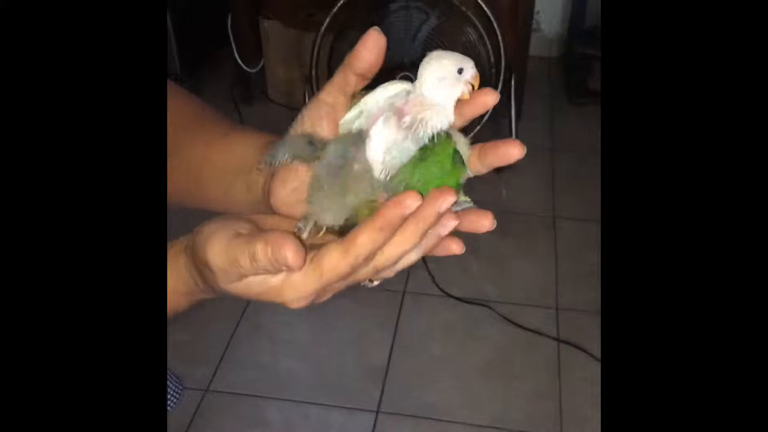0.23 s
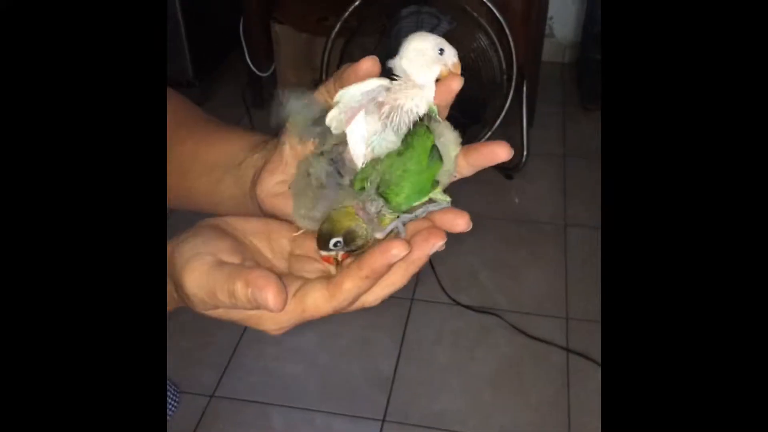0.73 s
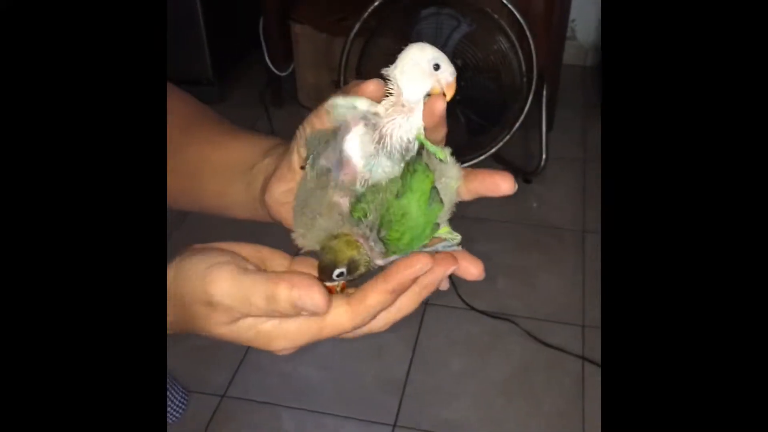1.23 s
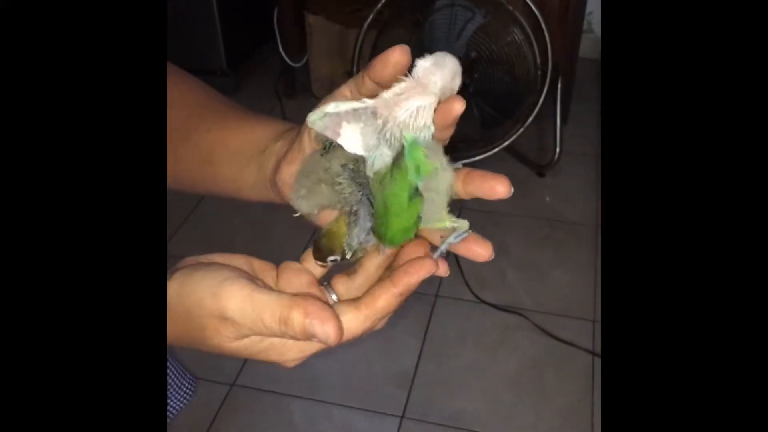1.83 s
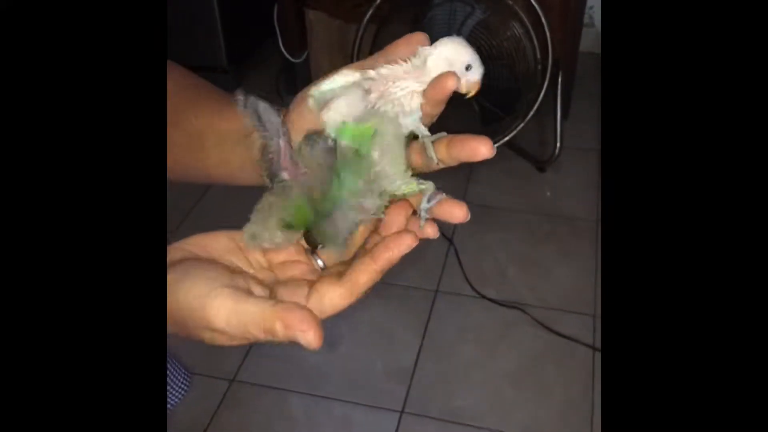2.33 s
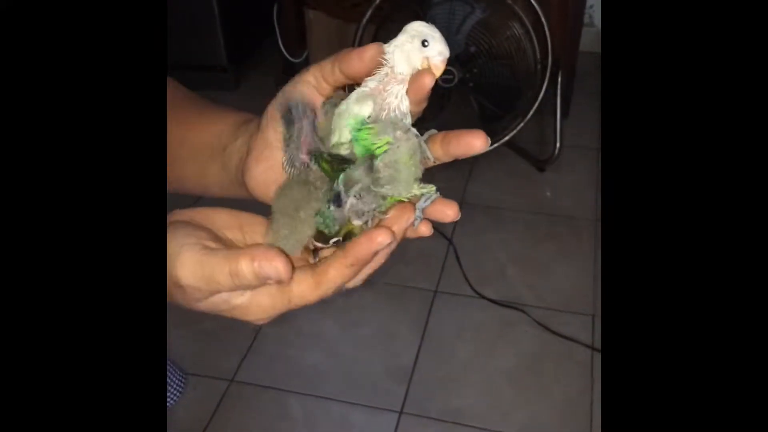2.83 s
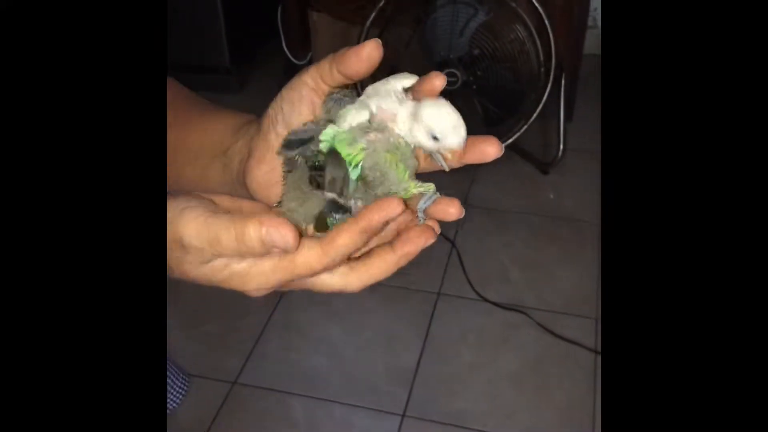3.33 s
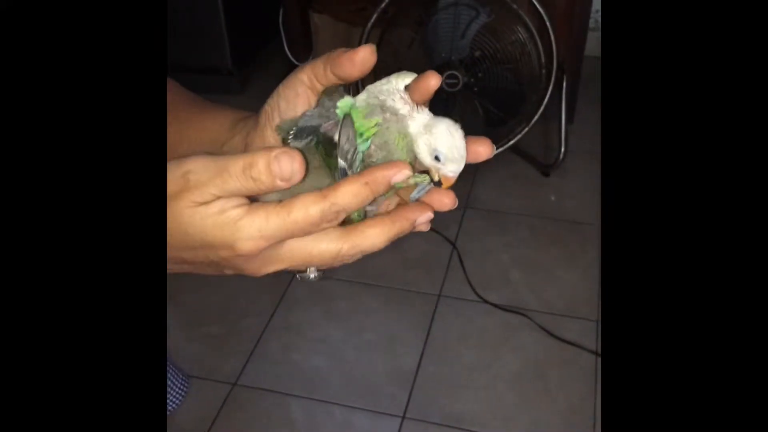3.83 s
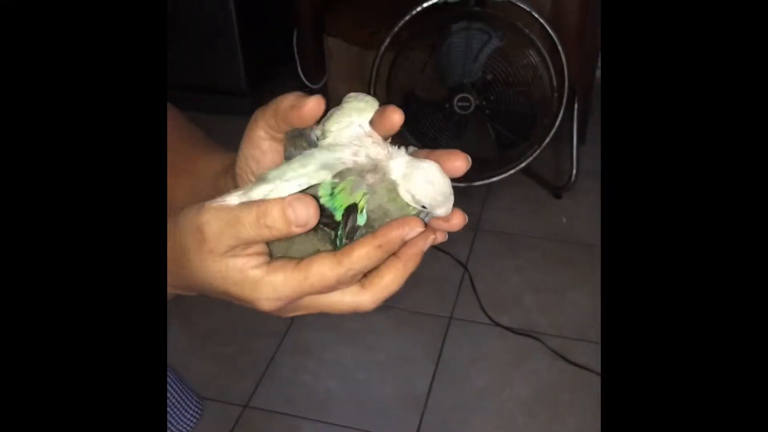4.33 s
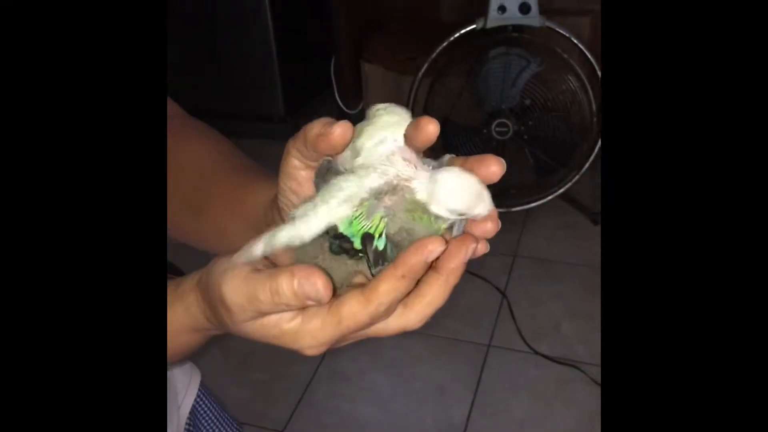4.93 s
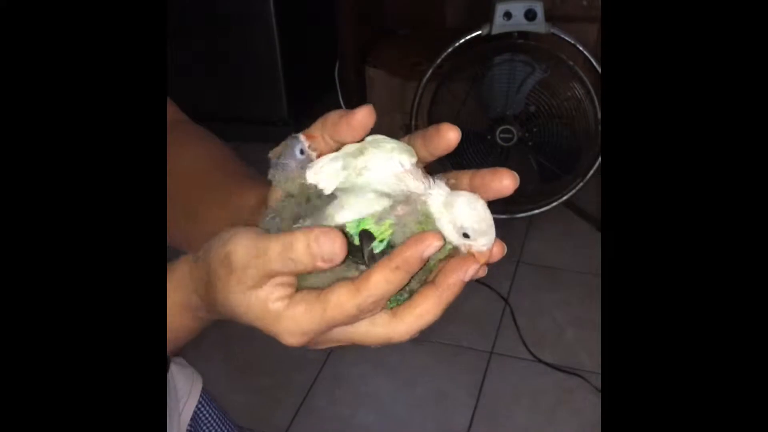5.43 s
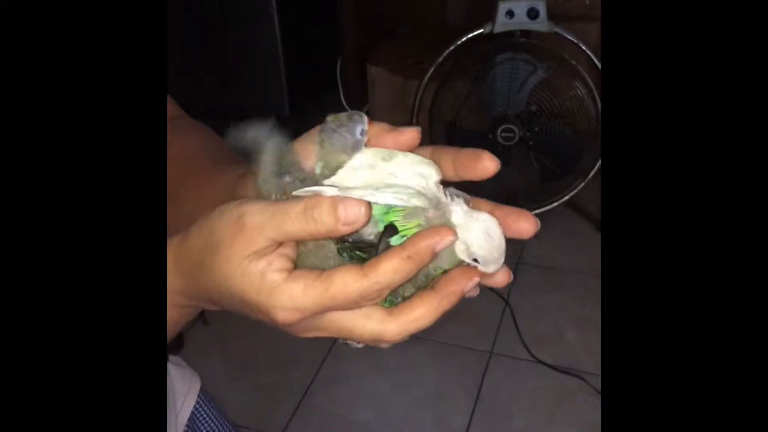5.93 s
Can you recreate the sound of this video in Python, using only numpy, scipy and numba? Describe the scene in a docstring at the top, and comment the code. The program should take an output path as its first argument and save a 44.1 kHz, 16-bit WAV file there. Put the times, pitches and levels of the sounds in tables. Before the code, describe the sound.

The sound fades in quickly on the faint low hum and airy rush of a floor fan, which continues throughout. Parrot chicks squawk close by, each call short, high, harsh and raspy. After one weak call at the start, two squawks come at about 0.5 to 0.8 seconds and two more at 1.1 to 1.3. A louder, rapid run of four follows from 1.7 to 2.4 seconds, and another cluster builds from 2.9 to 3.6, loudest near 3.3. From 3.7 to 4.8 seconds the squawking stops, leaving the fan, a few tiny peeps and soft scrapes of feathers and claws on skin. Similar light rustles lie between the other calls. Squawks return from 4.9 to 5.2 seconds, with two longer ones from 5.5 to 6. The tiled room gives the birds a short, bright echo.

```python
"""A floor fan's hum fades in; lovebird chicks held in cupped hands squawk in clusters in a tiled room.
Each squawk is a syrinx tone near 2-3 kHz that breaks into chaos and half-pitch lines, coloured by
throat and beak. Feather rustles and small peeps fill the gaps, and the tiles echo the birds.
The fan sounds multiples of its shaft rate over the rush of moving air."""
import sys
import numpy as np
from scipy import signal
from scipy.fft import rfft, irfft
from scipy.io import wavfile
from scipy.ndimage import uniform_filter1d
from numba import njit

SR = 44100
rng = np.random.default_rng(int(sys.argv[2]) if len(sys.argv) > 2 else 0)


def store_pcm(level_fs):
    """Save levels as 16-bit WAV."""
    pcm = np.round(np.clip(level_fs, -1, 1) * 32767).astype(np.int16)
    wavfile.write(sys.argv[1], SR, np.atleast_2d(pcm).T)


N = 272097


def undb(db):
    return 10 ** (np.asarray(db) / 20)


def unit(x):
    return x / np.sqrt(np.mean(x ** 2))


@njit
def svf(x, hz, width_hz, high):
    """State-variable filter with a moving centre: band-pass, or high-pass if high is 1."""
    y, band_state, low_state = np.empty(len(x)), 0., 0.
    for i in range(len(x)):
        g, damping = np.tan(np.pi * hz[i] / SR), width_hz[i] / hz[i]
        mid = (band_state + g * (x[i] - low_state)) / (1 + g * (g + damping))
        low = low_state + g * mid
        band_state, low_state = 2 * mid - band_state, 2 * low - low_state
        y[i] = high * (x[i] - damping * mid - low) + (1 - high) * damping * mid
    return y


def band(x, hz, width_hz):
    """A resonance applied twice, for steep skirts."""
    hz, width_hz = np.full(len(x), hz, float), np.full(len(x), width_hz, float)
    return svf(svf(x, hz, width_hz, 0.), hz, width_hz, 0.)


def walk(hz, count=N):
    """Smooth random wander of RMS 1, turning about hz times a second."""
    span = max(int(SR / hz), 1)
    return unit(uniform_filter1d(uniform_filter1d(rng.standard_normal(count), span), span))


def add(track, x, start_s):
    i = int(start_s * SR)
    track[i:i + len(x)] += x[:N - i]


def fan(shaft_hz=23.5, flutter_hz=16, flutter_depth=.9):
    """Shaft harmonics flutter in the turbulent intake, over moving air that swells slowly."""
    # Each row: multiple of the shaft rate, level in dB.
    harmonics = [(2, -49), (3, -51), (4, -60), (5, -60), (6, -58), (7, -58), (8, -61), (9, -62), (12, -67)]
    # Each row: frequency in Hz, relative spectral density in dB.
    air_spectrum = [(20, -17), (45, -13), (130, 0), (200, -12), (260, -9.5), (340, -8.5), (520, -15),
                    (850, -18.5), (1150, -14), (1800, -23), (2700, -19), (4500, -32.5), (6500, -32),
                    (15000, -38.5)]
    # Each row: time in seconds, mean air level in dB.
    air_levels = [(.3, -51.5), (1.4, -51.5), (2.7, -51.5), (3.3, -49), (4, -52), (5.1, -50), (6.1, -53)]
    phase = 2 * np.pi * np.cumsum(shaft_hz * (1 + .004255 * walk(1.83))) / SR
    hum = 0
    for k, db in harmonics:
        flutter = 1 + flutter_depth * (walk(flutter_hz) + 1j * walk(flutter_hz))
        hum += undb(db) * unit(np.imag(flutter * np.exp(1j * k * phase)))
    bin_hz = np.fft.rfftfreq(N, 1 / SR) + 1
    air_hz, air_db = np.transpose(air_spectrum)
    colour = undb(np.interp(np.log(bin_hz), np.log(air_hz), air_db, left=-40))
    air = unit(irfft(rfft(rng.standard_normal(N)) * colour, N))
    swell_db = np.interp(np.arange(N) / SR, *np.transpose(air_levels)) + 1.53 * walk(6)
    return hum + undb(swell_db) * air


def syrinx(hz, rough, half_share, chaos_hz=496.7, breath_db=3.5):
    """A chaotic cycle plus breath noise; every second beat is weaker, giving half-pitch lines."""
    jitter = .3 * (.0084 + 1.5 * rough ** 3) * walk(chaos_hz, len(hz))
    half_phase = np.pi * np.cumsum(hz * (1 + jitter)) / SR
    voice = undb(breath_db) * (rough + .46) * rng.standard_normal(len(hz))
    for k in range(1, 15):
        gain = (half_share if k % 2 else 1) * (k * hz / 2 < 16500)
        voice += gain * np.cos(k * half_phase + k ** 2)
    for _ in range(3):  # the tiny body radiates little below the pitch
        voice = svf(voice, (.9 - .041 * rough) * hz, 1.16 * hz, high=1.)
    return voice


def squawk(contour, colour, attack_s=.009, release_s=.015, rasp_hz=159):
    """The syrinx rings throat, beak and higher resonances. Returns the call and its start in seconds."""
    # Each row: centre in Hz, width in Hz, relative gain in dB.
    top_resonances = [(9500, 3000, 0), (12300, 2600, -3), (14600, 1600, -10)]
    times_s, *columns = np.transpose(contour)
    t = np.arange(times_s[0] - attack_s, times_s[-1] + release_s, 1 / SR)
    hz, level_db, lean_db, rough, half_share = (np.interp(t, times_s, c) for c in columns)
    base_db, throat_hz, beak_from_hz, beak_to_hz, upper_hz, upper_db, top_db, tire_db_per_s = colour
    voice = syrinx(hz, rough, half_share)

    widen = .42 + rough
    base = band(voice, hz, (.27 + .49 * rough) * hz)
    throat = band(voice, throat_hz, widen * 1400)
    beak = band(voice, np.linspace(beak_from_hz, beak_to_hz, len(t)), widen * 1800)
    upper = band(voice, upper_hz, widen * 2800)
    top = sum((-1) ** k * undb(db) * band(voice, centre_hz, width_hz)
              for k, (centre_hz, width_hz, db) in enumerate(top_resonances))

    age_s = t - t[0]
    tired_db = tire_db_per_s * age_s
    effort_db = level_db - level_db.max()  # weaker effort is duller
    scratch_db = 3 * walk(400, len(t))  # sharp closures spike the treble
    parts = [(base, base_db - 48 * age_s),
             (throat, np.minimum(-lean_db, 0)),
             (beak, np.minimum(lean_db, 0)),
             (upper, upper_db + .6 * effort_db - .95 * tired_db + scratch_db / 2),
             (top, top_db + .89 * effort_db - tired_db + scratch_db)]
    call = 0
    for part, db in parts:
        running_rms = np.sqrt(np.abs(uniform_filter1d(part ** 2, SR // 40)) + 1e-6)
        call += undb(level_db + db) * part / running_rms
    rasp = unit(undb(3.745 * rough * walk(rasp_hz, len(t))))  # membranes slap shut irregularly
    edges = np.clip(age_s / attack_s, 0, 1) * np.clip((t[-1] - t) / release_s, 0, 1)
    return call * rasp * edges ** 2, t[0]


def squawks():
    """Clusters of calls, each with its own pitch contour and resonances."""
    # One table per call. Each row: time in seconds, pitch in Hz, level in dB, beak over throat in dB,
    # roughness 0-1, half-pitch share 0-1.
    contours = [
        [(.13, 2270, -42, 15, 0.79, 0.3), (.2, 2326, -64.5, 22, 0.91, .9), (.26, 2420, -71, 2, 0.8, .4)],
        [(.455, 2688, -50, -4, .5, 0.4), (.478, 2680, -31.5, 3, 0.42, 0.8), (.49, 2693, -25, 15, 0.61, 0.8),
         (.494, 1797, -31.5, -7, 0.83, .9), (.525, 1865, -33, 0, 0.55, 1), (.56, 1840, -45.5, 6, 0.4, .9)],
        [(.62, 2012, -34.5, -29, 0.43, 0.7), (.65, 1694, -33.5, 2, .69, .9), (.685, 1666, -26, 6, 0.71, 1),
         (.715, 1864, -34.5, -33, 0.57, 0.7), (.75, 1540, -34, -12, 0.66, 1), (.785, 1783, -68, -12, 0.6, 0.6)],
        [(1.055, 3090, -50, -3, 0.82, 0.7), (1.072, 3067, -34, 19, 0.42, 0), (1.086, 3577, -34.5, -1, .2, 0),
         (1.105, 2870, -38, -7, 0.28, 0.15), (1.14, 2754, -37.5, 2, 0.52, 1), (1.175, 3470, -46, -6, .62, 0.3)],
        [(1.245, 3103, -37.5, 18, .4, .4), (1.262, 3124, -28.5, 1, 0.39, .15), (1.27, 3600, -38, -12, 0.16, .2),
         (1.288, 2850, -28, -21, 0.42, 0.2), (1.325, 3045, -55, -21, 0.66, .9)],
        [(1.73, 4283, -34.5, -3, 0.35, 0), (1.753, 4380, -29.5, 6, 0.58, .1), (1.757, 2152, -26, 11, 0.67, 0.1),
         (1.8, 2191, -28, 13, 0.58, 0.1), (1.84, 3100, -28, 5, 0.44, 0), (1.88, 3130, -24, 8.5, .49, 0),
         (1.915, 3170, -35, 9, 0.79, 0.4)],
        [(1.985, 2010, -30, 7, 0.56, 0.05), (2.01, 2059, -25.5, -4, 0.68, 0.8),
         (2.05, 2727, -31, 5.5, 0.61, .8), (2.085, 2710, -42, -10.5, 0.6, .2)],
        [(2.155, 2298, -33, 20, 0.56, 0), (2.185, 2383, -26.5, 1, 0.57, .8), (2.215, 2510, -27, 5, 0.75, .8),
         (2.24, 3464, -31.5, -14, 0.08, 0.3), (2.26, 3320, -34, 9, 0.2, 0.85)],
        [(2.36, 2545, -27, 20, 0.53, 0.5), (2.385, 2442, -25.5, -1.5, 0.6, .6),
         (2.41, 2563, -35, 9.5, 0.64, .7), (2.435, 2535, -54, 15, 0.45, .4)],
        [(2.885, 3056, -44.5, -9, 0.71, .8), (2.915, 3110, -42, -19, .78, 0.6),
         (2.99, 3040, -54.5, 1.5, 0.3, .9)],
        [(3.058, 3150, -34.5, -17, 0.42, 0.7), (3.075, 3170, -28, -19.5, 0.55, 0.75),
         (3.08, 3660, -41, -17, 0.13, 0.2), (3.097, 2890, -34, -4.5, 0.4, .4), (3.115, 3130, -48, 0.5, 0.55, 1)],
        [(3.232, 3070, -42, -9.5, 0.36, 0.4), (3.247, 3100, -37, 4, 0.28, .3),
         (3.253, 2441, -29.5, 14.5, 0.39, 1), (3.275, 2439, -21.5, 14.5, 0.26, 0),
         (3.31, 2501, -22.5, 15, 0.45, 1), (3.345, 2503, -21.5, -19, 0.26, 0.8),
         (3.375, 2472, -26, -2, 0.53, 0.8), (3.4, 2192, -26, 6, 0.49, 1), (3.435, 2364, -29, 8.5, 0.63, 1)],
        [(3.495, 2844, -27.5, 2, 0.49, 0.98), (3.52, 2930, -29, -3, 0.51, 0.92),
         (3.55, 2768, -31, -4, 0.54, 0.97), (3.585, 2842, -34, 8, 0.47, 1), (3.61, 2910, -27, 18, 0.62, 1)],
        [(4.83, 3880, -48.5, -11, 0.4, .5), (4.875, 3910, -62, -4, 0.75, .1)],
        [(4.925, 1988, -42, 10, 0.8, 0.5), (4.95, 2116, -29.5, -2.5, 0.91, 0.3),
         (4.985, 2675, -26.5, 2, 0.71, 0.9), (5.015, 2293, -34, 3, 0.87, 1), (5.045, 2160, -33, -9, 0.38, 1)],
        [(5.125, 2456, -24, 34, .59, .8), (5.15, 2506, -24.5, -0.5, 0.5, 1), (5.18, 2433, -28.5, -5.5, 0.66, 1),
         (5.21, 2453, -43, 1, 0.57, 1)],
        [(5.509, 2167, -27.5, 33, 0.41, 0.1), (5.53, 2200, -25.5, 8, 0.23, 0), (5.57, 2165, -25, 13, 0.27, 0.3),
         (5.6, 2320, -27.5, -1, .58, 0.9), (5.64, 2300, -25.5, -18, 0.57, 0.25),
         (5.68, 2324, -29.5, -8, 0.43, 1), (5.71, 2330, -34.5, 5, 0.62, 1)],
        [(5.825, 2994, -34, 28, 0.25, 0.79), (5.86, 3004, -31.5, 21, 0.41, 0.7),
         (5.9, 2980, -34, 17, 0.61, 0.46), (5.93, 2894, -34.5, 17.5, .5, 0.7),
         (5.96, 2924, -41.5, 22, 0.53, 0.3), (6.0, 2940, -71, 13, 0.6, 0.8)],
    ]
    # One row per call: fundamental offset in dB, throat in Hz, beak start and end in Hz, upper resonance
    # in Hz, upper and top offsets in dB, treble tiring in dB/s. Offsets are from the contour's level.
    colours = [(-19, 3200, 4400, 4600, 7400, -20, -22, 10), (-3.5, 3270, 3640, 6200, 6100, -6, -24, 90),
               (-4.5, 2990, 3700, 6100, 5600, -12, -12.5, 52), (-6.5, 3700, 4780, 3660, 7100, -4, -47, 80),
               (-9, 3890, 4770, 3500, 6100, -13, -51, 80), (-7, 4070, 4290, 4440, 7870, -1, -8.5, 37),
               (-9, 3050, 3730, 6800, 5760, -14.5, -8.5, 123),
               (-4, 3600, 4320, 4970, 6200, -27, -11.5, 120), (-9, 3160, 5080, 5700, 6600, -10, -19, 120),
               (0.5, 3800, 4030, 6100, 6800, 1, -40, 29), (-8.5, 3780, 4500, 4400, 5900, -4.5, -34, 57),
               (-8.5, 3750, 5170, 4100, 5720, -1, -10, 38), (-9, 3900, 4250, 4270, 8040, -4.5, -11.5, 39),
               (-8, 3300, 2900, 6400, 6300, -7, -17, 30), (-7, 3290, 4350, 4700, 5800, -6, -11, 92),
               (-4, 3430, 4830, 4750, 6250, -10, -19, 122), (-9.5, 3550, 4850, 4250, 6500, -2, -8, 64),
               (-16, 3600, 4400, 4480, 6230, -18, -15.5, 18)]
    out = np.zeros(N)
    for contour, colour in zip(contours, colours):
        add(out, *squawk(contour, colour))
    return out


def room(x, gain_db=.88, gap_s=.0029):
    """Dense echo off the tiles; the top treble dies first."""
    # Each row: band centre in Hz, 60 dB decay time in seconds, relative spectral density in dB.
    decays = [(1060, 0.42, -1.7), (1890, 0.71, -0.9), (2770, 0.5, 3.44), (4410, 0.65, -0.5),
              (6490, 0.46, 1), (8970, 0.42, 0.5), (14150, 0.39, 0)]
    t = np.arange(int(.9 * SR)) / SR
    tail = 0
    for hz, t60_s, db in decays:
        noise = unit(band(rng.standard_normal(len(t)), hz, .8 * hz))
        tail += noise * np.sqrt(hz) * undb(db - 60 * t / t60_s)
    tail *= np.clip(t / gap_s - 1, 0, 1)
    tail /= np.sqrt(np.sum(tail ** 2))
    return undb(gain_db) * signal.fftconvolve(x, tail)[:N]


def rustles(grain_db=3.5, grain_hz=200):
    """Feathers and claws scrape on skin: short bursts of grainy noise."""
    # Each row: start in seconds, length in seconds, centre in Hz, level before the envelope in dB.
    scrapes = [(0.262, 0.042, 9600, -53.5), (0.468, 0.21, 1390, -50), (0.639, 0.28, 1390, -46),
               (0.797, 0.056, 9050, -54), (2.72, 0.044, 11000, -81), (4.338, 0.055, 8900, -55),
               (4.673, 0.0022, 5960, -51), (4.688, .004, 6000, -62), (4.2, 0.16, 8900, -66),
               (4.788, 0.0036, 11000, -63), (5.263, 0.074, 10800, -47), (1.164, 0.32, 1040, -56),
               (2.047, 0.32, 1260, -48.5), (2.346, 0.11, 1100, -50), (2.976, 0.14, 1670, -50),
               (4.219, 0.25, 1420, -58), (4.315, 0.064, 3900, -49.5), (4.662, 0.051, 1920, -50),
               (4.83, 0.048, 8900, -58.5), (4.929, 0.059, 1290, -46.5), (5.11, 0.54, 1296, -52.5),
               (5.675, 0.043, 1550, -52), (5.985, 0.055, 1690, -51)]
    out = np.zeros(N)
    for start_s, length_s, hz, db in scrapes:
        n = int(length_s * SR)
        progress = np.linspace(0, 1, n)
        envelope = np.minimum(progress / .12, 1) * (1 - progress)
        grains = rng.standard_normal(n) * undb(grain_db * walk(grain_hz, n))
        add(out, undb(db) * unit(band(grains, hz, .8 * hz)) * envelope, start_s)
    return out


def peeps(wobble_depth=.025, wobble_hz=740):
    """Short, shaky falling tones with a weak octave."""
    # Each row: start in seconds, length in seconds, start and end pitch in Hz, level before the mix in dB.
    glides = [(1.37, .022, 2500, 950, -46), (3.03, .03, 2250, 2200, -47), (4.316, .028, 4900, 2900, -49),
              (4.37, .035, 2080, 2020, -55), (4.674, .022, 1650, 1450, -50), (4.75, .03, 2650, 1750, -46),
              (5.99, .03, 1250, 1150, -54)]
    out = np.zeros(N)
    for start_s, length_s, from_hz, to_hz, db in glides:
        n = int(length_s * SR)
        hz = np.linspace(from_hz, to_hz, n) * (1 + wobble_depth * walk(wobble_hz, n))
        phase = 2 * np.pi * np.cumsum(hz) / SR
        tone = np.sin(phase) + .19 * np.sin(2 * phase)
        add(out, undb(db) * np.hanning(n) ** .5 * tone, start_s)
    return out


def scene():
    """Chicks, echo and fan in mono. The peeps point at the listener, so the walls get less of them."""
    chicks = squawks() + rustles()
    peeping = peeps()
    direct = chicks + undb(3) * peeping
    echo = room(chicks + undb(-4) * peeping)
    return (direct + echo + fan())[None]


def record(dry, cutoff_hz=15500):
    """The level fades in and the top is cut."""
    # Each row: time in seconds, gain in dB. The last gain holds.
    fade_in = [(.11, -56), (.125, -21.5), (0.149, -10.5), (.19, -3.5)]
    gain = undb(np.interp(np.arange(N) / SR, *np.transpose(fade_in), left=-90))
    lowpass = signal.ellip(10, .2, 70, cutoff_hz, fs=SR, output="sos")
    return signal.sosfilt(lowpass, dry * gain)


dry = scene()
out = record(dry)
store_pcm(out)
```